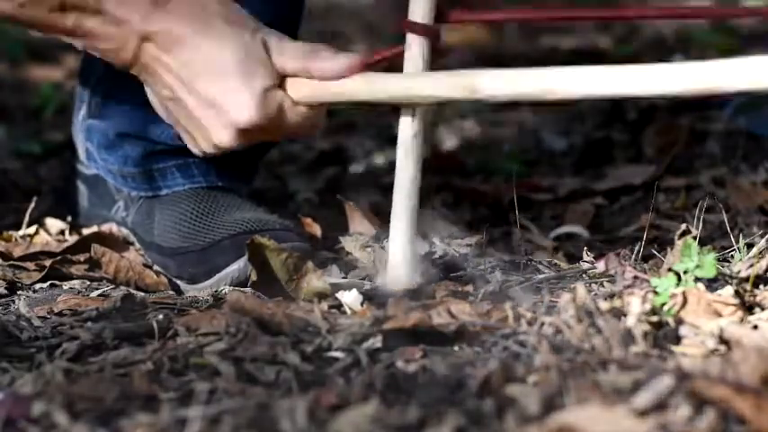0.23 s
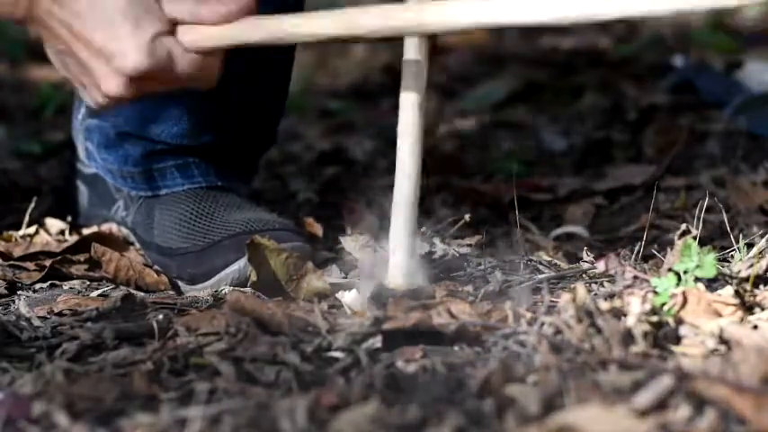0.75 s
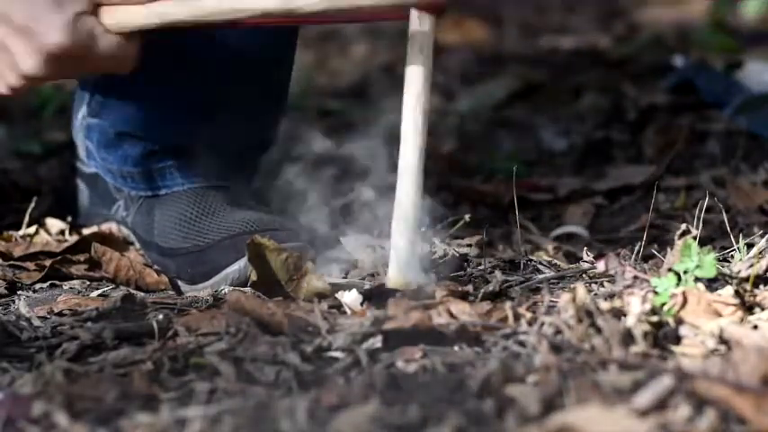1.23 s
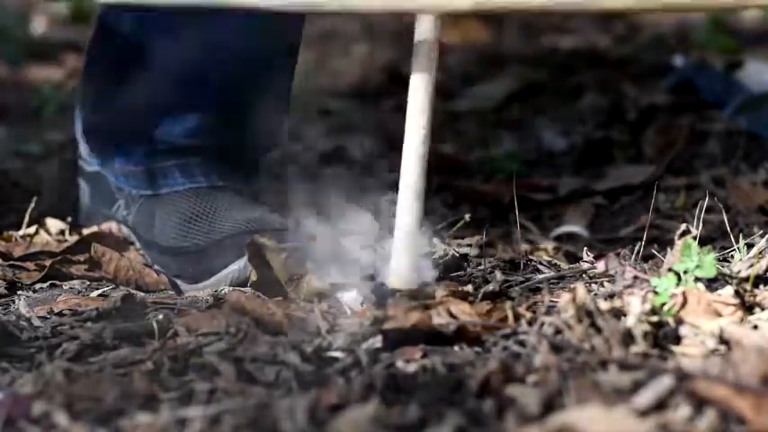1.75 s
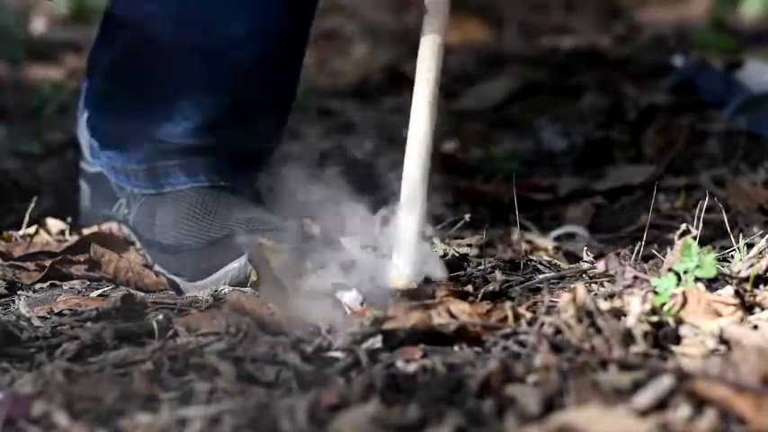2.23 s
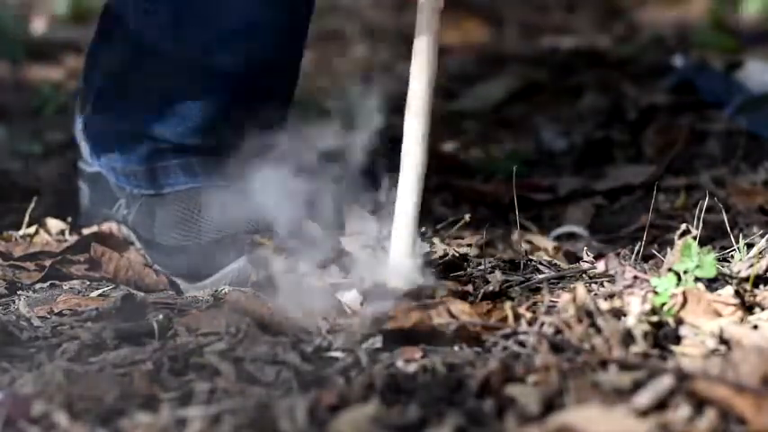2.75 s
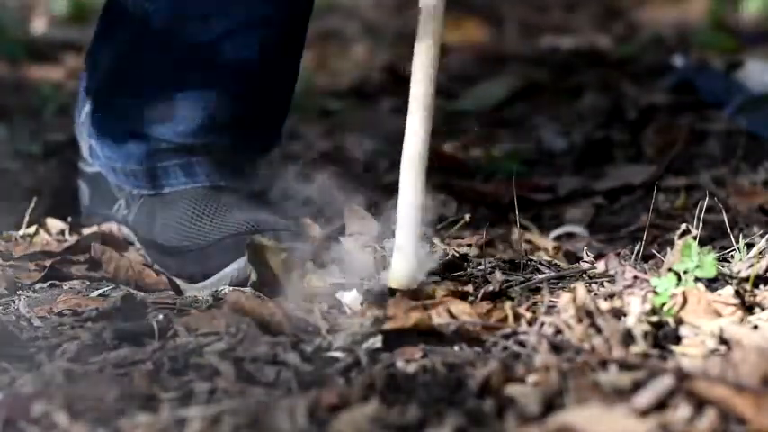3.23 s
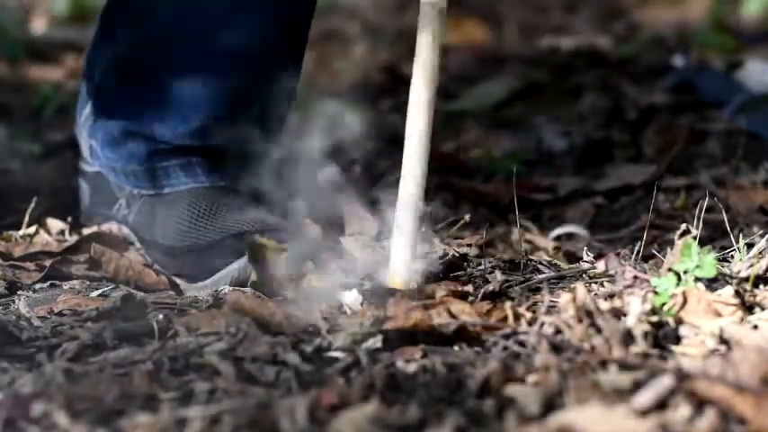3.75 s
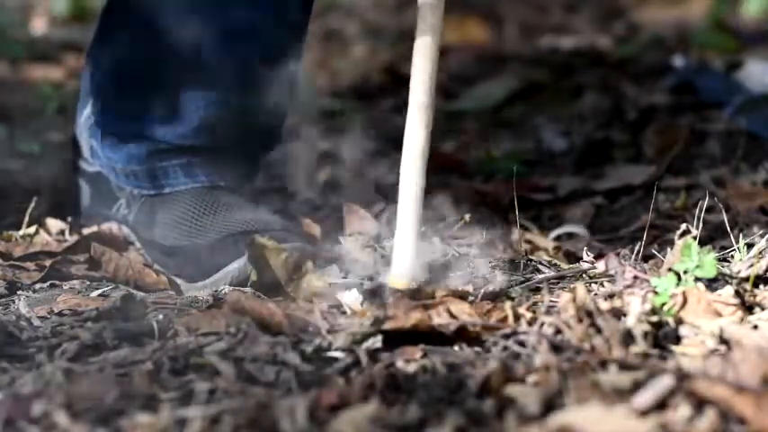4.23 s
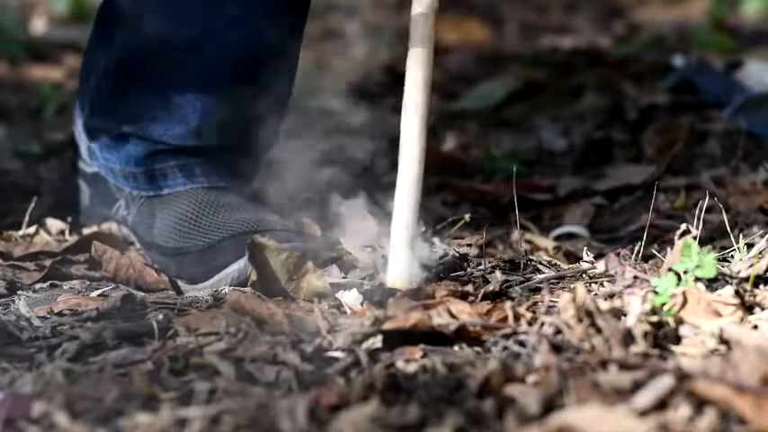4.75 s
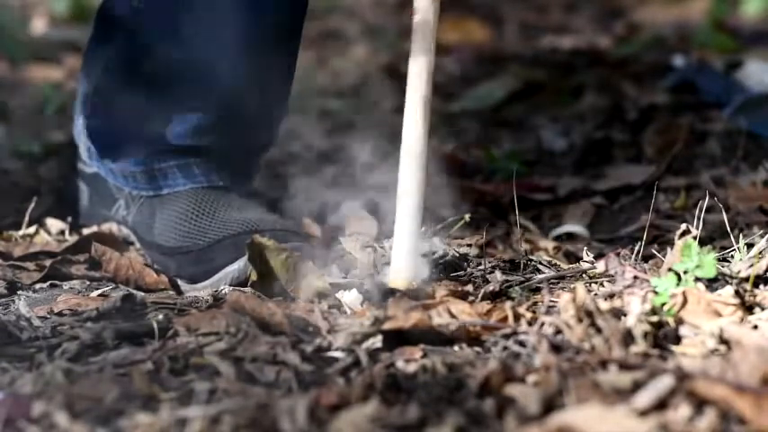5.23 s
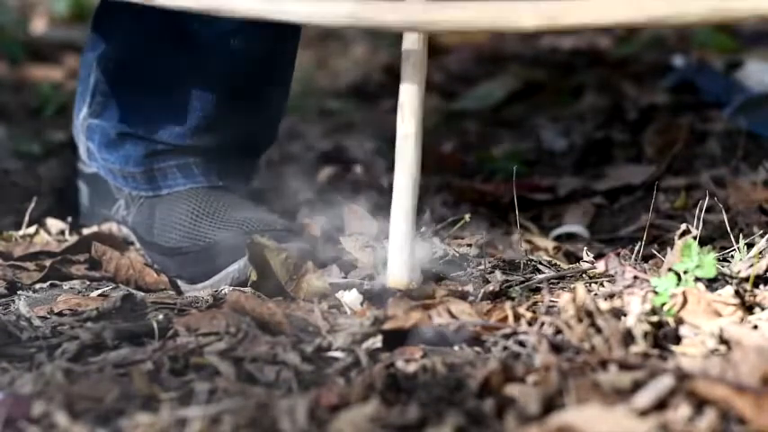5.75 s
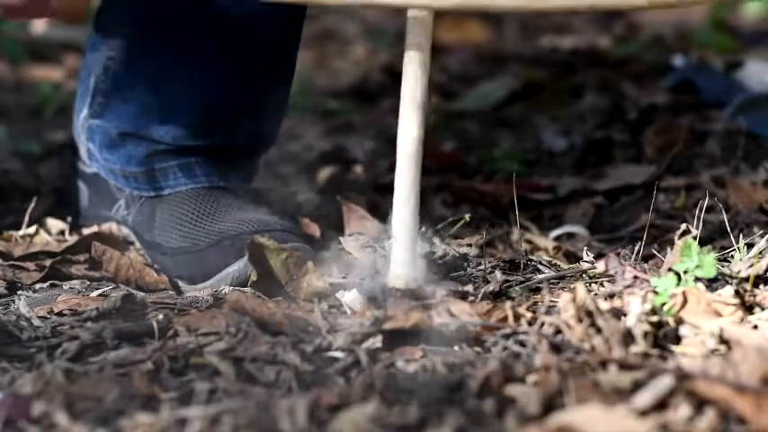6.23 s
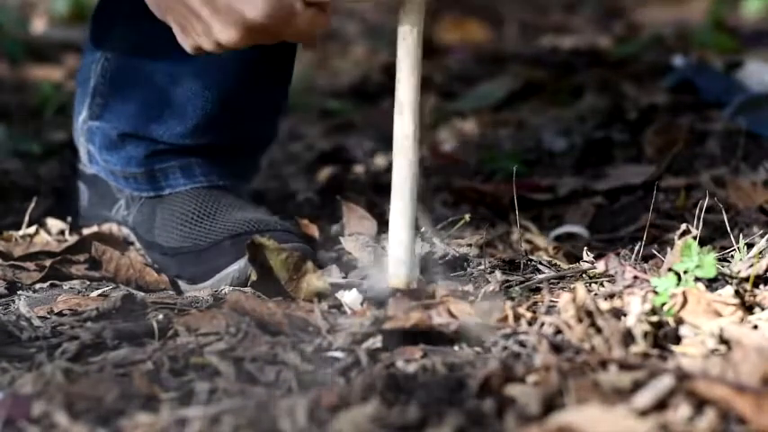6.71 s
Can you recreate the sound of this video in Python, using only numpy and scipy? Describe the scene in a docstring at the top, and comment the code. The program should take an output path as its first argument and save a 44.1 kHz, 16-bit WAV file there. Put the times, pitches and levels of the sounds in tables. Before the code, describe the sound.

A wooden spindle grinds back and forth in a board in quick strokes, with short shrill squeaks growing piercing, over faint outdoor air.

```python
"""A faint outdoor murmur is heard first, and at once the grind of a bow drill: a wooden spindle turning
back and forth in its board, about four strokes a second. Grinding is random fibre slips exciting resonances.
As the socket chars and glazes, stick-slip oscillation squeaks once a turn, shrilly mostly on forward strokes.
Knocks are decaying modes, and trees return scattered echoes. Far traffic is filtered noise with a thin whine;
a fast limiter flattens the loudest squeaks."""
import sys
import numpy as np
from scipy import signal
from scipy.fft import rfft, irfft, next_fast_len
from scipy.io import wavfile
from scipy.ndimage import uniform_filter1d, minimum_filter1d, map_coordinates

SR = 44100
rng = np.random.default_rng(int(sys.argv[2]) if len(sys.argv) > 2 else 0)


def dump(signal):
    """Clip the signal to [-1, 1] and save it as 16-bit WAV at the path in sys.argv[1]."""
    limited = np.clip(np.atleast_2d(signal).T, -1, 1)
    pcm = np.round(limited * 32767).astype(np.int16)
    wavfile.write(sys.argv[1], SR, pcm)


N = 307818  # length [samples]


def amp(db):
    """Logarithmic level: decibels to amplitude gain."""
    return 10 ** (np.asarray(db) / 20)


def unit(x):
    """Power normalisation: the signal scaled to rms 1."""
    return x / np.sqrt(np.mean(x ** 2) + 1e-20)


def along(points, hz):
    """Logarithmic frequency scale: (frequency [Hz], value) points interpolated along it."""
    f, v = np.transpose(points)
    return np.interp(np.log(hz + 1), np.log(f + 1), v)


def curves(rows):
    """Linear interpolation in time: one value per sample for each column after the time."""
    s, *columns = np.transpose(rows)
    return [np.interp(np.arange(N) / SR, s, column) for column in columns]


def wobble(rate):
    """Band-limited fluctuation: a smooth random curve through `rate` knots a second."""
    knots = rng.standard_normal(int(N * rate / SR) + 4)
    return map_coordinates(knots, [np.arange(N) * rate / SR])


def filtered(x, response):
    """Linear filtering: the spectrum of x times a complex response of frequency."""
    size = next_fast_len(N + SR // 2)
    hz = np.fft.rfftfreq(size, 1 / SR)
    return irfft(rfft(x, size) * response(hz), size)[:N]


def coloured(x, spectrum):
    """Spectral shaping: x weighted by a spectrum in dB, at rms 1."""
    return unit(filtered(x, lambda hz: amp(along(spectrum, hz))))


def ringing(x, modes):
    """Modal superposition: x through resonances of alternating sign, at rms 1."""
    def response(f):
        total = 0
        for k, (centre, width, db) in enumerate(modes):
            resonance = 1j * f * width / (centre ** 2 - f ** 2 + 1j * f * width)
            total = total + (-1) ** k * amp(db) * resonance
        return total / (1 + (f / 4700) ** 8)  # wood swallows the treble
    return unit(filtered(x, response))


def slips(rate, scatter_db):
    """Random impulse excitation: fibres catch and let go at random moments with random strengths."""
    released = rng.random(N) < rate / SR
    return released * rng.standard_normal(N) * amp(scatter_db * rng.standard_normal(N))


# spectrum of the outdoor air: (frequency [Hz], relative density [dB per Hz])
AIR_SPECTRUM = [(25, -36.5), (45, -31.5), (80, -12), (115, -4.5), (175, 0.5), (300, -5), (520, -11),
                (950, -7.5), (1600, -15), (2600, -21), (3700, -24), (4600, -36.5), (8000, -42),
                (13000, -48)]
# mean level of the air, about which it wanders: (time [s], level [dB])
AIR_LEVEL = [(0, -45), (2.3, -43.5), (3.1, -43), (3.8, -44.5), (5.5, -44), (7, -45)]
# spectrum of a brief swell: (frequency [Hz], relative density [dB per Hz])
SWELL_SPECTRUM = [(60, -40), (250, -20), (600, -3.5), (1000, 0), (1400, -5), (2500, -24.5), (6000, -80)]
SWELL_S, SWELL_WIDTH_S, SWELL_DB = 3.03, .2, -46.5  # time of peak, spread, peak level
WHINE_HZ = 1009


def background():
    """Filtered noise: far traffic and air swell slowly, with a thin distant whine."""
    t = np.arange(N) / SR
    level_db, = curves(AIR_LEVEL)
    air = amp(level_db + 0.97 * wobble(3.5)) * coloured(rng.standard_normal(N), AIR_SPECTRUM)
    swell_shape = np.exp(-((t - SWELL_S) / SWELL_WIDTH_S) ** 2)
    swell = amp(SWELL_DB) * swell_shape * coloured(rng.standard_normal(N), SWELL_SPECTRUM)
    phase = 2 * np.pi * np.cumsum(WHINE_HZ + 1.8 * wobble(12)) / SR
    whine = amp(-57.8 + 1.6 * wobble(3.8)) * np.sin(phase)
    return air + swell + whine


# the bowing slows as the strokes lengthen; even strokes push, odd ones pull: (time [s], strokes done [count])
BOWING = [(0, 0), (1.345, 6), (2.055, 9), (2.808, 12), (4.8, 20), (5.31, 22), (5.825, 24), (6.62, 27)]
# how hard the spindle is pressed down: (time [s], relative grind level [dB], relative dust hiss level [dB])
PRESSURE = [(0.1, -40, -64.5), (1.5, -43, -67), (2.5, -42, -67.5), (3.1, -39.5, -67), (4.9, -38, -64.5),
            (5.8, -39.5, -66.5), (6.5, -38, -63.5)]
# spindle and board on a push: (frequency [Hz], width [Hz], relative level [dB])
PUSH_MODES = [(1406, 230, -6), (2225, 150, -7), (3340, 180, 2.5), (3773, 160, -21.5), (4560, 66, -11.5)]
# spindle and board on a pull: (frequency [Hz], width [Hz], relative level [dB])
PULL_MODES = [(1515, 82, -1), (2208, 120, 3), (3350, 120, -0.5), (3870, 790, -15.5)]
# broad rasp of the wood: (frequency [Hz], relative density [dB per Hz])
RASP_SPECTRUM = [(60, -14.5), (120, -0.5), (240, 6), (450, -4), (850, -0.5), (1150, -14), (1500, 2),
                 (1900, -4.5), (2300, 1), (2750, 0), (3500, 2.5), (3900, -2.5), (4300, -10.5),
                 (6000, -42.5)]
# hiss of the wood dust: (frequency [Hz], relative density [dB per Hz])
DUST_SPECTRUM = [(3000, -21.5), (4400, -1), (4680, 9.5), (5050, -7.5), (5750, 1), (6250, 5), (6900, -4),
                 (7450, -6.5), (8100, 3), (9000, -11.5), (9900, -5), (11000, -11), (12200, -8),
                 (15500, -27)]
PULL_GRIND_DB, PULL_DUST_DB = -1.42, -1.7  # a pull is weaker than a push


def grinding(top_turns_per_s=36, throb_db=1.05, grain_db=0.75, chatter_db=2,
             push_skew=1.095, pull_skew=0.852, rest_share=.03):
    """Dry friction: slips excite the wood, growing with sliding speed and throbbing once a turn."""
    t = np.arange(N) / SR
    strokes_done, = curves(BOWING)
    grind_db, dust_db = curves(PRESSURE)
    pushing = np.floor(strokes_done) % 2 == 0
    travel = np.minimum(strokes_done % 1 / (1 - rest_share), 1)  # the bow rests briefly before it turns
    skew = np.where(pushing, push_skew, pull_skew)  # a push is fastest late, a pull early
    speed = np.abs(np.sin(np.pi * travel ** skew))
    angle = 2 * np.pi * np.cumsum(top_turns_per_s * speed) / SR
    bite = amp(throb_db * np.sin(angle) + grain_db * wobble(260))

    forward = amp(5.5) * speed ** 3.1 * ringing(slips(rate=2300, scatter_db=0), PUSH_MODES)
    back = amp(1.5) * speed ** 1.5 * ringing(slips(rate=1600, scatter_db=2.5), PULL_MODES)
    glaze = np.interp(t, [1.5, 4.2], [0, 1])  # the polished socket rings more and rasps less
    ring = amp(-3.3 + 2.6 * glaze + chatter_db * wobble(110)) * np.where(pushing, forward, back)
    rasp_noise = coloured(slips(rate=6000, scatter_db=1.5), RASP_SPECTRUM)
    rasp = amp(3.0 - 3.8 * glaze) * speed ** 1.57 * rasp_noise
    dust_noise = coloured(slips(rate=22000, scatter_db=0.5), DUST_SPECTRUM)
    dust = amp(9.0) * speed ** 1.7 * dust_noise

    grind_gain = amp(grind_db + PULL_GRIND_DB * ~pushing)
    dust_gain = amp(dust_db + PULL_DUST_DB * ~pushing)
    return bite * (grind_gain * (ring + rasp) + dust_gain * dust)


# decay of the echo: (frequency [Hz], time to fall 60 dB [s])
ECHO_DECAY = [(300, .2), (3300, 0.25), (6500, .36), (10000, 0.15)]
# spectral balance of the echo: (frequency [Hz], relative level [dB])
ECHO_COLOUR = [(300, -2.5), (3300, 1), (5200, 1.5), (6400, 5.5), (7500, -2), (12000, -6.5)]


def trees(x, delay_s=.014, sparse_db=4):
    """Scattering: trunks and ground return sparse echoes, rich in the octave radiated sideways."""
    arrivals = slips(rate=2100, scatter_db=sparse_db)[:SR // 2]
    hz, t, z = signal.stft(arrivals, SR, nperseg=256)
    decay = amp(-60 * t / along(ECHO_DECAY, hz)[:, None])
    tail = signal.istft(z * decay, SR, nperseg=256)[1]
    tail = np.pad(tail / np.linalg.norm(tail), (int(delay_s * SR), 0))
    echo = signal.fftconvolve(x, tail)[:N]
    return filtered(echo, lambda hz: amp(along(ECHO_COLOUR, hz)))


TURN_S = .03  # nominal time of one turn
SAG_HZ_PER_S, TOP_LAG_S = 6000, .003  # a longer squeak sags deeper; its pitch tops just after its middle


def squeal(rows, jitter_hz=18, flutter_db=0.83, octave_db=-29, scrape_db=-42, spit_db=3,
           attack=3, snap=4, release=2.5):
    """Stick-slip oscillation: a mode locks in; its pitch arches over each squeak and sags between."""
    t = np.arange(N) / SR
    power, weight, pitch = np.zeros(N), np.full(N, 1e-12), np.zeros(N)
    for s, length, db, hz in rows:
        near = slice(max(int((s - 2 * length) * SR), 0), int((s + 2 * length) * SR))
        u = (t[near] - s) / (length / 2)
        rise = attack + snap * min(1, amp(db))  # a strong squeak catches abruptly
        steepness = np.where(u < 0, rise, release)
        swell = np.exp(-2 * np.abs(u) ** steepness)
        power[near] += amp(db) ** 2 * swell
        weight[near] += swell
        sag = np.sin(np.pi * (t[near] - s - TOP_LAG_S) / TURN_S) ** 2
        pitch[near] += swell * (hz - SAG_HZ_PER_S * length * sag)
    pitch = pitch / weight + jitter_hz * wobble(500)
    phase = 2 * np.pi * np.cumsum(pitch) / SR
    level = np.sqrt(power) * amp(flutter_db * wobble(400))

    # the octave flares as it sweeps over a higher mode of the spindle
    mode_hz, half_width_hz = 6330, 130
    flare = 1 / np.hypot(1, (2 * pitch - mode_hz) / half_width_hz)
    octave = amp(octave_db + 3.1 * wobble(110)) * flare
    overtones = octave * (np.sin(2 * phase) + amp(-22.5) * np.sin(4 * phase))
    # spectrum of the grit: (frequency [Hz], relative level [dB])
    grit_spectrum = [(300, -12), (3300, -6), (5000, 2), (7500, -6.5), (15000, -10.5)]
    scrape = amp(scrape_db) * coloured(rng.standard_normal(N), grit_spectrum)
    scrape = scrape * amp(spit_db * wobble(250))  # the grit comes in spits
    hardness = np.minimum(level, 1)  # only a hard slip is lopsided and gritty
    return level * (np.sin(phase) + hardness * (overtones + scrape))


# exponents: turns quicken, level settles, louder squeaks last longer
SPEED_UP, LOCK_IN, LENGTH_GROWS = .91, 3.0, .33
# between the last two turns the tone holds on, lower: share of the gap, sag by squeak length
HOLD_SHARE, HOLD_SAG_HZ_PER_S = .55, 8200


def turns(runs, full_length_s):
    """Periodic excitation: one squeak a turn, as rows (middle [s], length [s], level [dB], top pitch [Hz])."""
    rows = []
    for first_s, last_s, first_db, last_db, hold_db, hz in runs:
        count = round(abs(last_s - first_s) / TURN_S) + 1
        progress = np.linspace(0, 1, count)
        s = first_s + (last_s - first_s) * progress ** SPEED_UP
        db = last_db + (first_db - last_db) * (1 - progress) ** LOCK_IN
        length = full_length_s * amp(LENGTH_GROWS * db)
        rows += zip(s, length, db, np.full(len(s), hz))
        if len(s) > 1:  # by the last turn the tone no longer quite lets go
            hold_length = HOLD_SHARE * (s[-1] - s[-2])
            hold_hz = hz - HOLD_SAG_HZ_PER_S * length[-1]
            rows.append((s[-2:].mean(), hold_length, db[-2:].min() + hold_db, hold_hz))
    return rows


# runs of squeaks, one a turn: (first time [s], last time [s], first level [dB], last level [dB],
# tone held before the last turn, relative to the quieter of the last two squeaks [dB], top pitch [Hz])
SQUEAK_RUNS = [(0.09, 0.145, -25, -30, -12.5, 3340), (0.553, 0.579, -23, -25, -15, 3350),
               (0.994, 0.994, -24, -24, -15, 3360), (1.458, 1.486, -28, -22, -10, 3335),
               (1.947, 1.974, -23.5, -26, -11.5, 3335), (2.121, 2.121, -28, -28, -15, 3315),
               (2.421, 2.479, -20, 0, -1.5, 3335), (2.912, 2.944, -18, -21.5, -15.5, 3358),
               (2.974, 2.974, -13, -13, -15, 3360), (3.416, 3.476, -27, -2, -20, 3370),
               (3.917, 3.978, -16.5, 1, 3.5, 3325), (4.169, 4.206, -32, -28.5, -14.5, 2165),
               (4.426, 4.488, -12.5, -1.5, -14, 3362), (4.639, 4.729, -30, -33.5, -14, 2225),
               (4.927, 4.986, -21, 0, -12, 3340), (5.136, 5.136, -19, -19, -15, 2180),
               (5.152, 5.152, -29, -29, -15, 3370), (5.436, 5.463, -30, -28, -4, 3320),
               (5.941, 6.006, -12, -0.5, -18, 3368), (6.156, 6.182, -24, -19.5, -15, 2182),
               (6.165, 6.195, -20, -28.5, 4, 3325), (6.217, 6.26, -27, -30, -13, 2215)]
SHRILL_LENGTH_S, LOW_LENGTH_S = .0225, .016  # length of a squeak at 0 dB
# the higher mode: top pitch, level relative to the first squeak, length
HIGH_MODE_HZ, HIGH_MODE_DB, HIGH_MODE_S = 4694, -23, 0.0085


def squeaks():
    """Mode selection: mostly a shrill mode, lower on some back strokes; a higher one chirps as a run swells."""
    shrill = [run for run in SQUEAK_RUNS if run[-1] > 2700]
    low = [run for run in SQUEAK_RUNS if run[-1] <= 2700]
    high = []
    for first_s, _, first_db, last_db, *_ in shrill:
        if last_db > first_db:
            high.append((first_s, HIGH_MODE_S, first_db + HIGH_MODE_DB, HIGH_MODE_HZ))
    shrill_tone = squeal(turns(shrill, SHRILL_LENGTH_S))
    low_tone = squeal(turns(low, LOW_LENGTH_S), jitter_hz=34.6, flutter_db=2.0)
    chirps = squeal(high, jitter_hz=45, flutter_db=1.5)
    return shrill_tone + low_tone + chirps


# knocks of the spindle as the bow turns round: (time [s], relative level [dB])
TICKS = [(0.4507, -36), (1.3568, -36), (1.567, -34.5), (2.801, -27)]


def ticks(t60=0.015):
    """Impact: the slack spindle knocks in its socket, exciting a decaying mode and a burst of noise."""
    t, out = np.arange(SR // 20) / SR, np.zeros(N)
    # spectrum of the crack: (frequency [Hz], relative level [dB])
    crack_spectrum = [(500, 6), (2200, -0.5), (3800, 2), (5000, -20), (13000, -22.5), (15000, -33.5)]
    grit = coloured(rng.standard_normal(N), crack_spectrum)
    onset = 1 - np.exp(-t / .0005)
    for s, db in TICKS:
        start = int(s * SR)
        ring = np.sin(2 * np.pi * 2200 * t) * amp(-60 * t / t60)
        crack = amp(-5.5) * grit[start:][:len(t)] * amp(-60 * t / 0.011)
        out[start:][:len(t)] += amp(db + 1.5) * (ring + crack) * onset
    return out


def scene():
    """Superposition: the drill close by, its echo and the background."""
    drill = grinding() + squeaks() + ticks()
    return (drill + amp(-24.2) * trees(drill) + background())[None]


TOP_HZ = 15800  # upper band limit


def record(dry, ceiling=0.67, knee=0.83):
    """Peak limiting: a fast gain holds the peaks, soft saturation rounds them, and the band is limited."""
    x = dry[0]
    needed = 1 / (1 + np.abs(x / ceiling) ** 14) ** (1 / 14)
    gain = uniform_filter1d(minimum_filter1d(needed, size=40), size=20)  # sizes in samples
    x = x * gain
    x = x / (1 + np.abs(x / knee) ** 6) ** (1 / 6)
    return filtered(x, lambda hz: hz < TOP_HZ)[None]


dry = scene()
out = record(dry)
dump(out)
```